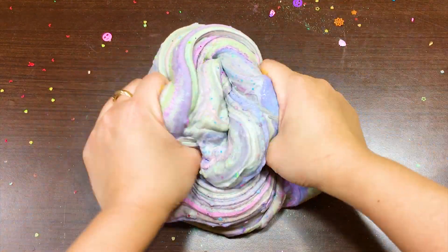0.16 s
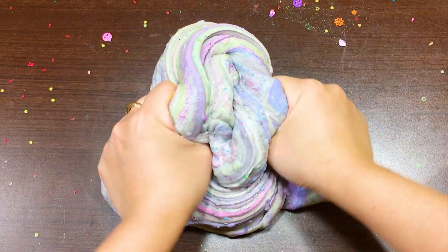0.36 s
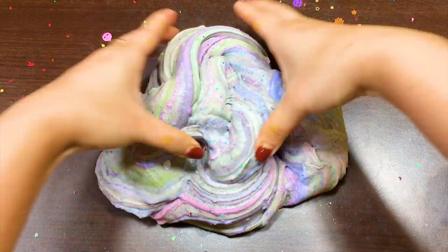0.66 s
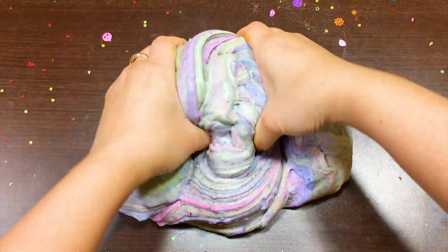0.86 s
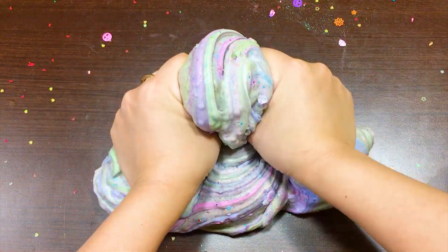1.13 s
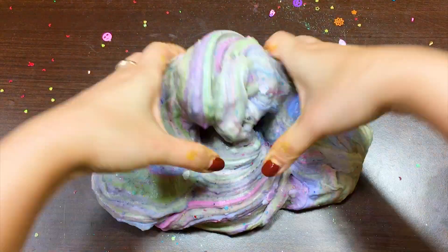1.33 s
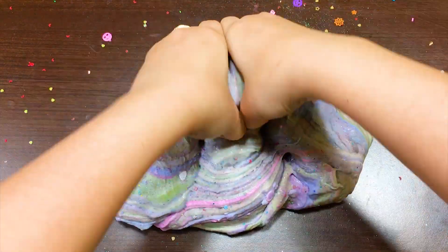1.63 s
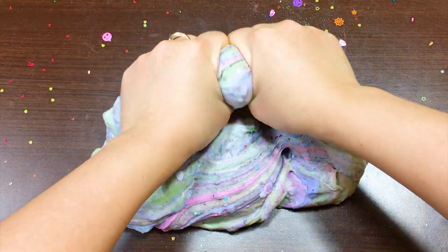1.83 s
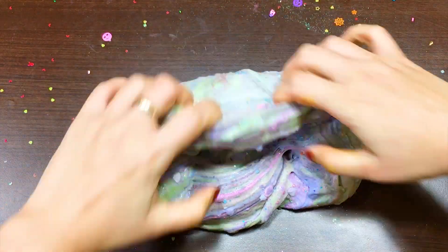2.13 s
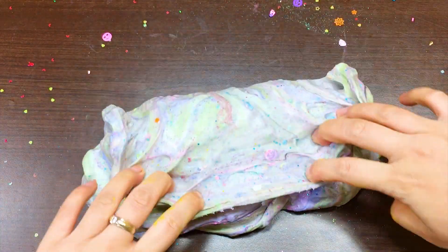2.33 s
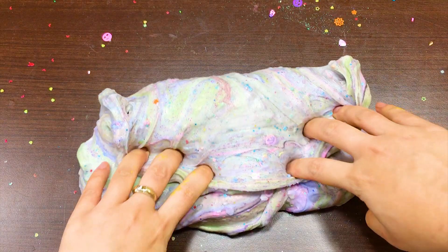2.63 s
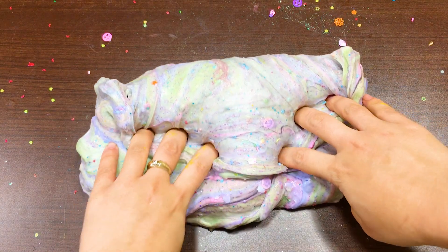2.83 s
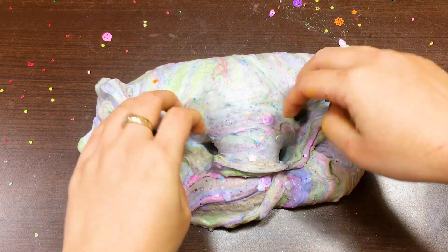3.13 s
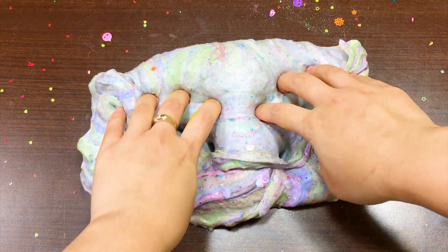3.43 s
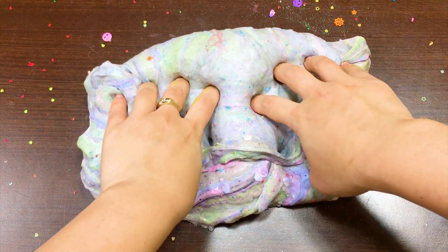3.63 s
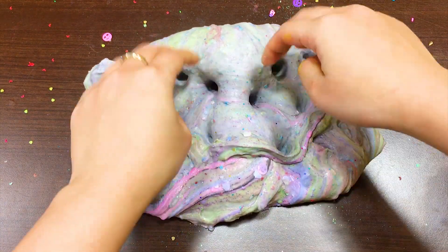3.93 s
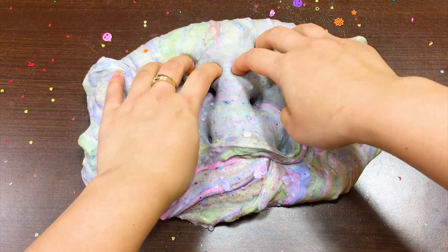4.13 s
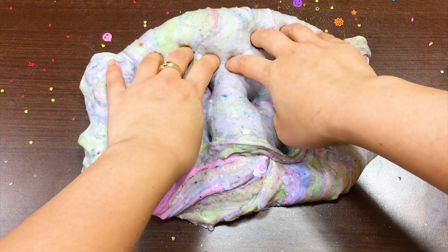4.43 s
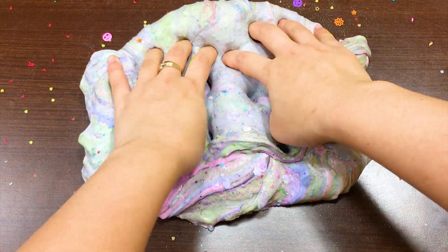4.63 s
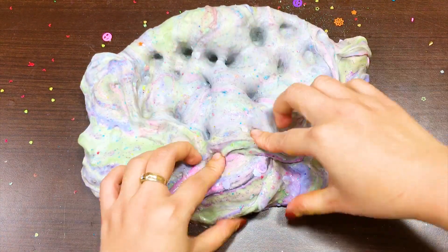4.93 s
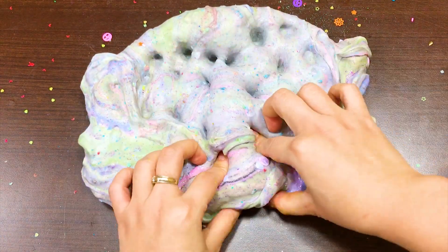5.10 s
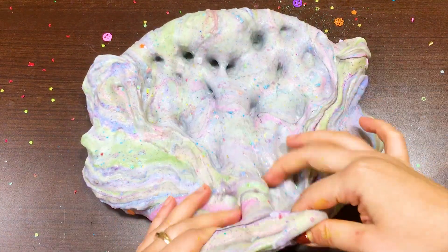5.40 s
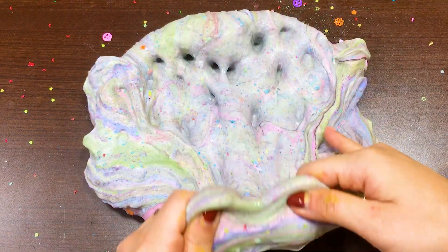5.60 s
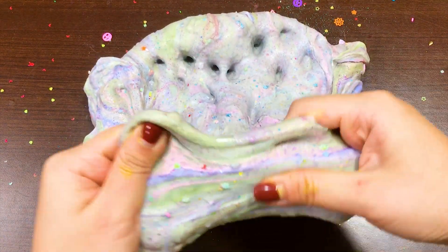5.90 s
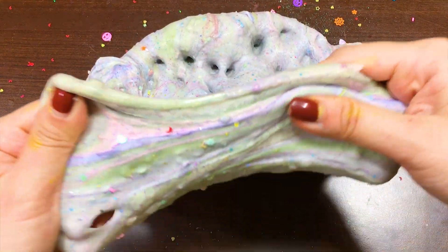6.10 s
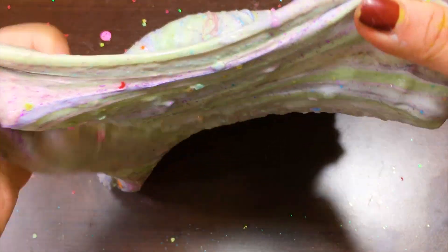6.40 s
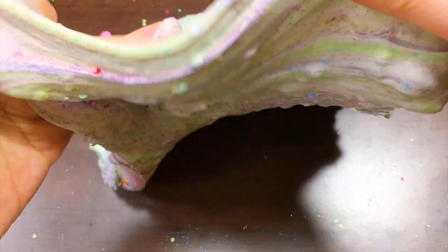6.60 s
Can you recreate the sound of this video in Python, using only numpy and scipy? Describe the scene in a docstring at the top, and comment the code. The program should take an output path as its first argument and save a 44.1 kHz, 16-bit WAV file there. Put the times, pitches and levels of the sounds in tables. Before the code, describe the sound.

Two hands knead gooey slime in a small quiet room, miked closely. Crackly squelching opens busily, and trapped bubbles burst in sharp, bright clicks. Sticky skin tears away in brief gritty rips that swell and stop abruptly, knocking the table into a dull hum. Three strong snapping peels come around three, four and nearly five seconds, separated by quiet ticking. Then only gentle sticky stretching and small crackles remain over soft hiss.

```python
"""Sticky slime kneaded by two hands on a wooden table in a quiet room, heard close up.
Trapped bubbles burst as sharp pops, made of short damped sines and a spray of noise.
Skin peeling off the slime tears thousands of tiny threads, each a damped sine at its own pitch.
Every pull shakes the table top: noise drives its low resonances, which hum on.
Filtered noise lies underneath as room air and microphone hiss."""
import sys
import numpy as np
from scipy import signal
from scipy.fft import rfft, irfft, next_fast_len
from scipy.io import wavfile
from scipy.ndimage import map_coordinates

SR = 44100
rng = np.random.default_rng(int(sys.argv[2]) if len(sys.argv) > 2 else 0)


def generate_wav(signal):
    """Clip the signal to [-1, 1] and save it as 16-bit WAV at the path in sys.argv[1]."""
    frames = np.transpose(np.atleast_2d(signal))
    scaled = np.clip(frames, -1, 1) * 32767
    pcm = np.round(scaled).astype(np.int16)
    wavfile.write(sys.argv[1], SR, pcm)


N = 297675


def amp(db):
    """Decibels to gain."""
    return 10 ** (np.asarray(db) / 20)


def unit(x):
    """Scaled to rms 1."""
    return x / np.sqrt(np.mean(x ** 2) + 1e-20)


def along(points, hz):
    """Reads a curve of (Hz, value) points on a log frequency axis."""
    point_hz, value = np.transpose(points)
    return np.interp(np.log(hz + 1), np.log(point_hz + 1), value)


def curves(rows):
    """One value per sample for each column after the time."""
    s, *columns = np.transpose(rows)
    return [np.interp(np.arange(N) / SR, s, column) for column in columns]


def wobble(rate):
    """A smooth random curve with rate knots a second."""
    knots = rng.standard_normal(N // 50)
    return map_coordinates(knots, [np.arange(N) * rate / SR])


def filtered(x, response):
    """Filters x by a gain or complex response given as a function of frequency."""
    size = next_fast_len(N + SR // 2)
    hz = np.fft.rfftfreq(size, 1 / SR)
    return irfft(rfft(x, size) * response(hz), size)[..., :N]


def modes(resonances):
    """Causal response of a set of resonances (Hz, width Hz, dB), alternating in sign."""
    def response(f):
        total = 0
        for k, (center, width, db) in enumerate(resonances):
            damping = 1j * f * width
            total = total + (-1) ** k * amp(db) * damping / (center * center - f * f + damping)
        return total
    return response


def rung(level, resonances):
    """Noise of the given level shakes a set of modes, which ring on after it."""
    noise = rng.standard_normal(N)
    response = modes(resonances)
    return filtered(level * noise, response) / np.std(filtered(noise, response))


def snaps(s, gain, hz, cycles, size):
    """Damped sines that swell over about the first cycle and lose 60 dB in the given cycles."""
    k = np.arange(size)
    turns = np.outer(np.clip(hz, 300, 16000) / SR, k)
    shape = (1 - np.exp(-2 * turns)) * amp(-60 * turns / cycles)
    waves = gain[:, None] * np.sin(2 * np.pi * turns) * shape
    at = np.round(s * SR).astype(int)[:, None] + k
    return np.bincount(at.ravel(), waves.ravel(), N + size)[:N]


def threads(count, hz, spread, cycles, scatter_db, clump_db, size):
    """Tearing in clumps: each thread snaps at its own level and at a pitch scattered around hz."""
    u = rng.random((count, 2))
    z = rng.standard_normal((count, 2))
    start_s = u[:, 0] * N / SR
    pitch = hz[(u[:, 0] * N).astype(int)] * np.exp(spread * z[:, 0])
    stray = np.minimum(-np.log(1 - u[:, 1]), 4)  # a few threads stray far from the common level
    gain = amp(scatter_db * stray) * np.sign(z[:, 1])
    tear = snaps(start_s, gain * np.sqrt(pitch), pitch, cycles, size)  # longer low snaps start softer
    return unit(tear * amp(clump_db * wobble(60)))


# skin ripping off the slime: loudest_s, build_up_s, length_after_s,
# thick_threads_db, thin_threads_db, table_shake_db, thick_pitch_hz
SKIN_RIPS = [(0.523, 0.082, 0.079, -30.5, -27, -34, 2600), (1.142, 0.045, 0.027, -45.5, -40, -40.5, 2300),
             (1.247, 0.014, 0.016, -61, -41, -45.5, 2300), (1.348, 0.032, 0.014, -41, -33.5, -35.5, 2300),
             (1.393, 0.15, 0.057, -33.5, -32, -41, 2306), (1.763, 0.055, 0.0059, -52, -53, -83, 3500),
             (2.138, 0.081, 0.057, -37.5, -32, -51, 2600), (3.122, 0.073, 0.036, -40.5, -35.5, -34.5, 1386),
             (3.968, 0.084, 0.0069, -33.5, -30, -35, 1800), (4.784, 0.059, 0.014, -31, -27, -41, 1900),
             (5.327, 0.11, 0.13, -37, -38.5, -63, 3500), (5.651, 0.11, 0.037, -57.5, -57, -73, 3200),
             (5.787, 0.086, 0.0031, -49.5, -49, -83, 3300), (6.431, 0.082, 0.018, -44, -46.5, -77, 5200),
             (6.51, 0.11, 0.0091, -49.5, -49.5, -59.5, 2080), (6.573, 0.031, 0.0052, -46, -40, -88, 1840),
             (6.608, 0.028, 0.0057, -43.5, -48.5, -58.5, 5900)]
# steady kneading between the rips: start_s, thick_threads_db, thin_threads_db, table_shake_db
KNEADING = [(0, -52.5, -49, -53.5), (.34, -60.5, -53, -51.5), (.41, -80, -69.5, -56.5),
            (.66, -67.5, -62.5, -66), (.98, -56.5, -56, -53.5), (1.3, -87, -51.5, -81),
            (1.6, -68.5, -62.5, -69), (1.87, -55, -56.5, -57), (2.31, -59, -54.5, -63),
            (2.47, -80, -66.5, -68.5), (3.03, -77.5, -67.5, -62.5), (3.7, -74.5, -84.5, -83.5),
            (4.0, -69, -61, -72), (4.31, -66, -59.5, -61.5), (4.36, -75.5, -72, -82.5),
            (4.7, -74.5, -72.5, -64.5), (4.85, -66, -62, -61), (5.25, -65, -56, -56), (5.85, -61, -63, -70),
            (6.19, -63.5, -61.5, -66.5), (6.3, -75, -66.5, -64.5), (6.75, -73, -64.5, -102)]
BUILD_DB, SAG_DB_PER_S, LET_GO_DB_PER_S = 37.5, 134.5, 904.5  # climb, sag while ripping, fall after
SETTLE_DB, SETTLE_DB_PER_S = -10.5, 120.5  # the table keeps trembling as the lump slumps back


def handwork():
    """Gains of thick threads, thin threads and table: each rip builds, sags and lets go over the kneading."""
    gains = amp(curves(KNEADING))
    t = np.arange(N) / SR
    table_only = np.array([[0], [0], [1]])
    for s, build, length, *db, _ in SKIN_RIPS:
        since = t - s
        after = np.maximum(since - length, 0)
        climb_db = BUILD_DB * since / build
        fall_db = -SAG_DB_PER_S * (since - after) - LET_GO_DB_PER_S * after
        rip = amp(np.where(since < 0, climb_db, fall_db))
        settle = (since > 0) * amp(SETTLE_DB - SETTLE_DB_PER_S * abs(since))
        gains = gains + amp(db)[:, None] * rip + amp(db[2]) * settle * table_only
    return gains


def peeling(thick_gain, thin_gain):
    """Skin lifts off the slime: thick threads sound low, thin ones high, and tiny bubbles tick one by one."""
    wander = np.exp(wobble(40) / 12)  # pockets of one size open together
    pitch_hz, = curves([(rip[0], rip[-1]) for rip in SKIN_RIPS])
    thick = threads(count=6000, hz=pitch_hz * wander, spread=0.2346, cycles=22,
                    scatter_db=2.5, clump_db=3.5, size=300)
    deepest = threads(count=3000, hz=1500 * wander, spread=0.22, cycles=27,
                      scatter_db=1.5, clump_db=4.5, size=300)
    thick = thick + amp(-2.0) * deepest
    thin = threads(count=30000, hz=np.full(N, 9000), spread=0.68, cycles=1.5,
                   scatter_db=-1.0, clump_db=2.02, size=70)
    ticks = threads(count=750, hz=np.full(N, 6500), spread=0.86, cycles=2.6,
                    scatter_db=2.5, clump_db=3.5, size=200)
    spent_db = 1.3 * np.arange(N) / SR  # kneading uses up the bubbles
    ticks *= np.clip(thin_gain, amp(-72), amp(-56)) * amp(-spent_db)
    return thick_gain * thick + thin_gain * thin + ticks


# shoves that rock the table on its legs: start_s, relative_level_db, fade_s (time to fall to 1/e)
LEG_SHOVES = [(0, -37.5, 0.046), (0.572, -40, 0.1), (1.452, -46, 0.13), (3.101, -44, 0.24),
              (3.981, -48, 0.16), (4.801, -39.5, 0.052), (5, -42, 0.056)]
# resonances of the table top: center_hz, width_hz, relative_level_db
TABLE_MODES = [(115, 8.5, -14.5), (174, 8, -4.5), (203.1, 3.5, 1.5), (292.5, 8, 2.5), (377.2, 10, -2.5),
               (445, 23, -5), (670, 60, -14)]
# slow rocking resonances of the legs: center_hz, width_hz, relative_level_db
LEG_MODES = [(53.5, 46, 14), (74, 8, -1)]


def table_top(shake):
    """Pulls shake the table top in lumps, pops knock it, and the legs rock slowly."""
    shaken = rung(shake * amp(1.1 * wobble(22)), TABLE_MODES)
    squelch = amp(-3) * rung(shake, [(306, 120, 0.0)])  # the lump itself is shaken too

    blows = np.zeros(N)
    for s, db, hz in BUBBLE_POPS:  # a loud, large (low) bubble pushes hardest
        blows[round(s * SR)] = amp(2.11 * db + 54.0 - 13.65 * np.log2(hz / 1500))
    slime_mode = [(407, 72, 0.024)]  # the soft lump answers with one dull swing
    knocks = filtered(blows, modes(slime_mode)) + amp(-8.5) * filtered(blows, modes(TABLE_MODES))

    t = np.arange(N) / SR
    shoves = sum(amp(db) * (t > s) * np.exp(-abs(t - s) / fade) for s, db, fade in LEG_SHOVES)
    swing = np.sin(2 * np.pi * LEG_MODES[0][0] * t + 0.3 * wobble(6))
    sway = amp(3) * shoves * swing  # a shove leaves a clean swing
    unrest = amp(-62.0 + 3.6 * wobble(3))  # faint rumble that never stops
    rocking = rung(amp(-7.5) * shoves + unrest, LEG_MODES)
    return shaken + squelch + knocks + sway + rocking


# spectrum of room tone and hiss: frequency_hz, relative_level_db
AIR_SPECTRUM = [(28, -110), (50, -87), (100, -85.5), (430, -100), (800, -110), (1500, -112), (6000, -116),
                (16000, -118)]


def air():
    """Steady room tone and microphone hiss: white noise shaped by one spectrum."""
    return filtered(rng.standard_normal(N), lambda hz: amp(along(AIR_SPECTRUM, hz) + 43))


# bursting bubbles: start_s, relative_level_db, cavity_pitch_hz
BUBBLE_POPS = [(0.0069, -22, 2650), (0.0263, -23.5, 5560), (0.0799, -23.5, 7500), (0.124, -21, 7750),
               (0.14, -24.5, 7050), (0.158, -23, 4330), (0.17, -34, 12900), (0.185, -19.5, 6550),
               (0.227, -28.5, 6800), (0.2389, -26, 2490), (0.2412, -29, 10500), (0.3095, -18.5, 8700),
               (0.3103, -34, 9800), (0.3364, -18.5, 6900), (0.361, -37, 7600), (0.368, -30.5, 1750),
               (0.423, -33, 8900), (0.529, -19, 3030), (0.5492, -16, 2470), (0.7761, -36.5, 2430),
               (0.8037, -34.5, 9500), (0.8653, -30, 4540), (0.926, -36, 12200), (0.9345, -36, 7200),
               (0.9923, -22.5, 10800), (1.02, -31, 12100), (1.119, -13.5, 1760), (1.1402, -9, 4380),
               (1.1849, -14, 8300), (1.2022, -27.5, 1900), (1.2163, -24.5, 9600), (1.2367, -11.5, 5730),
               (1.2433, -3.5, 7200), (1.247, -12, 7450), (1.3502, -24.5, 2450), (1.3604, -37, 1480),
               (1.3849, -13, 3240), (1.6257, -14, 4300), (1.6493, -25.5, 2770), (1.662, -47, 7000),
               (1.6816, -31.5, 4870), (1.707, -48, 6000), (1.722, -33.5, 5100), (1.75, -31.5, 12200),
               (1.7643, -33.5, 3600), (1.768, -36.5, 2250), (1.81, -37, 6500), (1.849, -37.5, 3900),
               (1.864, -26.5, 5730), (1.8923, -35, 5960), (1.9098, -34, 3690), (1.9216, -26, 2320),
               (1.9322, -33, 7500), (1.953, -28, 9700), (1.9715, -21.5, 6750), (1.989, -29, 14490),
               (2.0228, -23.5, 1210), (2.12, -41, 12500), (2.1286, -22, 3900), (2.188, -27.5, 1190),
               (2.3148, -35.5, 4700), (2.3748, -42, 3760), (2.4444, -44, 6940), (2.488, -41, 5760),
               (2.5335, -36.5, 9300), (2.6067, -30.5, 10440), (2.7723, -40, 4180), (2.858, -41.5, 3360),
               (2.9384, -34, 2800), (3.0987, -7.5, 6660), (3.1418, -15, 5800), (3.1444, -18.5, 1390),
               (3.265, -45.5, 4600), (3.35, -47, 1330), (3.431, -51, 1430), (3.9384, -11.5, 7400),
               (3.9541, -8, 7500), (3.9624, -2.5, 7900), (3.9708, -21.5, 2500), (4.191, -39, 4540),
               (4.3606, -40, 7430), (4.6214, -28.5, 2040), (4.7752, -4.5, 8700), (4.7968, -7.5, 7200),
               (4.9939, -39, 1240), (5.2351, -34.5, 1380), (5.297, -28, 7000), (5.306, -33, 7500),
               (5.3287, -22.5, 3470), (5.742, -39, 12000), (5.788, -32.5, 2530), (6.1782, -38, 1840),
               (6.3727, -41, 4800), (6.395, -40, 3000), (6.5769, -36.5, 1760), (6.6982, -42.5, 1840),
               (6.743, -47, 5500)]


def pops():
    """The opened cavity rings a few cycles, shreds of film snap around its pitch, spray scatters after."""
    s, db, hz = np.transpose(BUBBLE_POPS)
    z = rng.standard_normal((len(s), 600))
    cavity = snaps(s, amp(db + 6.0), hz, cycles=11.6, size=500)
    slap = snaps(s, amp(db - 10.5), 0.26 * hz, cycles=4.2, size=300)  # the wall caves in, duller

    db, pitch = db[:, None], hz[:, None]
    late, ratio, loud = (z[:, k:k + 6] for k in (0, 6, 12))  # six shreds a bubble
    shred_s = s[:, None] + 0.00044 * abs(late)
    shred_gain = amp(db + 1 + 1.5 * loud)
    shred_hz = pitch * np.exp(0.19 + 0.5 * ratio)
    shreds = snaps(shred_s.ravel(), shred_gain.ravel(), shred_hz.ravel(), cycles=6.0, size=300)

    t = np.arange(z.shape[1]) / SR
    crack = amp(db - 22.5 - 60 * t / 0.0009)  # loses 60 dB in 0.9 ms
    scatter = amp(0.89 * db - 12.0 - 60 * t / 0.011)  # loses 60 dB in 11 ms
    noise = (crack + scatter) * z * np.sqrt(pitch / 6000)
    at = np.round(s * SR).astype(int)[:, None] + np.arange(len(t))
    spray = np.bincount(at.ravel(), noise.ravel(), N + len(t))[:N]
    return cavity + slap + shreds + signal.lfilter([1, -1], [1, -.8], spray)  # low end cut from the spray


# reflections off hands, table and nearby things: delay_s, level_db
NEAR_ECHOES = [(.0014, -26.5), (.0026, -19), (.0050, -15.5)]


def near(x):
    """Adds a few quick reflections to the direct sound."""
    return x + sum(amp(db) * np.pad(x, (round(s * SR), 0))[:N] for s, db in NEAR_ECHOES)


# how long the room rings: frequency_hz, t60_s (time to lose 60 dB)
ROOM_DECAY = [(300, 0.79), (2000, 0.1), (12000, 0.022)]


def room(x):
    """Each frequency of the room's answer, a tail of decaying noise, dies at its own speed."""
    hz, t, z = signal.stft(rng.standard_normal(SR // 2), SR, nperseg=128)
    decay = amp(-60 * t / along(ROOM_DECAY, hz)[:, None])
    tail = signal.istft(z * decay, SR, nperseg=128)[1]
    delayed = np.pad(x, (200, 0))  # samples
    return signal.fftconvolve(delayed, tail / np.linalg.norm(tail))[:N]


def scene():
    """Slime, table and room as one channel."""
    thick, thin, shake = handwork()
    slime = near(pops()) + peeling(thick, thin)
    walls = amp(-17) * room(slime)
    return (slime + walls + table_top(shake) + air())[None]


# microphone colour: frequency_hz, gain_db
MIC_COLOUR = [(25, -16.5), (45, -3), (800, -4.5), (1400, -4.5), (3700, -3), (5400, -2.5), (7600, 0),
              (10000, -0.5), (11500, -2.5), (15700, -2), (16200, -46.5)]
TOP_HZ = 17000  # nothing passes from here up


def record(dry):
    """Microphone colour, then the band limit."""
    return filtered(dry, lambda hz: amp(along(MIC_COLOUR, hz)) * (hz < TOP_HZ))


dry = scene()
out = record(dry)
generate_wav(out)
```